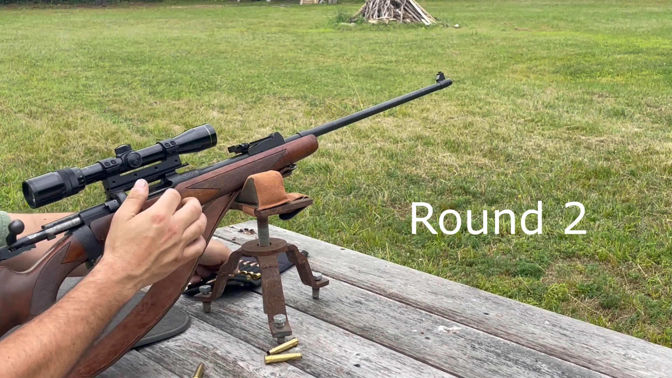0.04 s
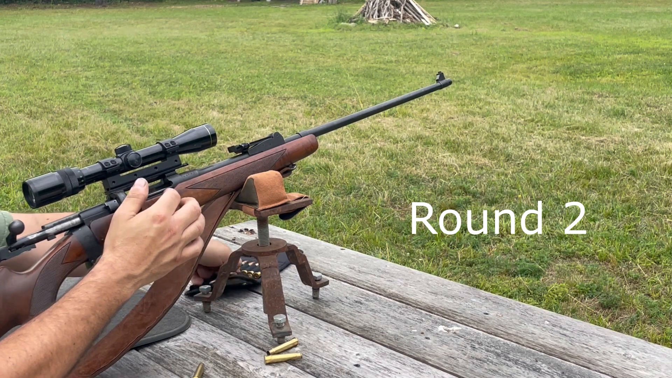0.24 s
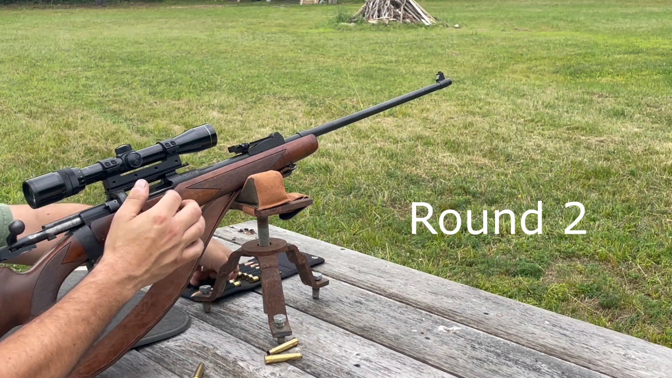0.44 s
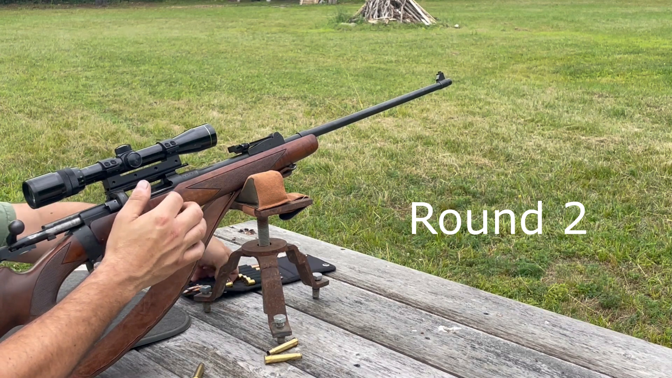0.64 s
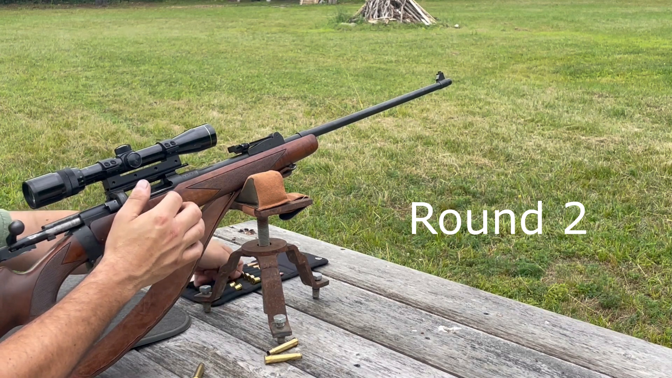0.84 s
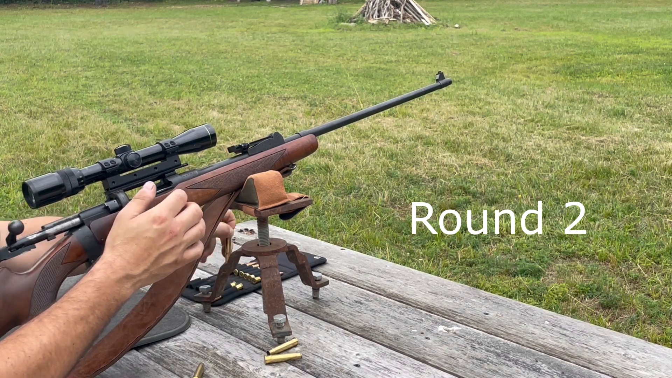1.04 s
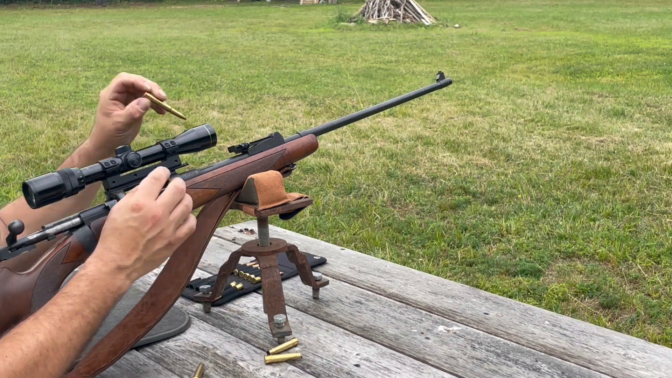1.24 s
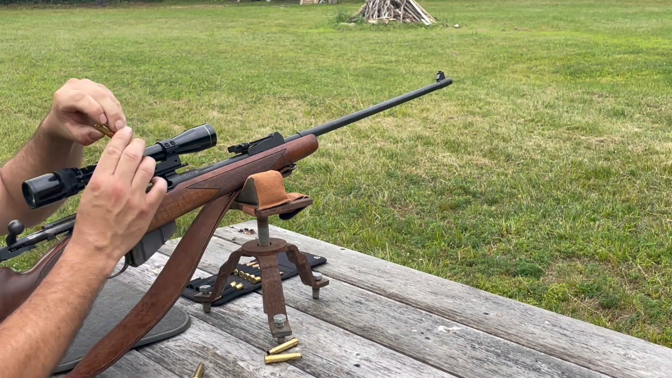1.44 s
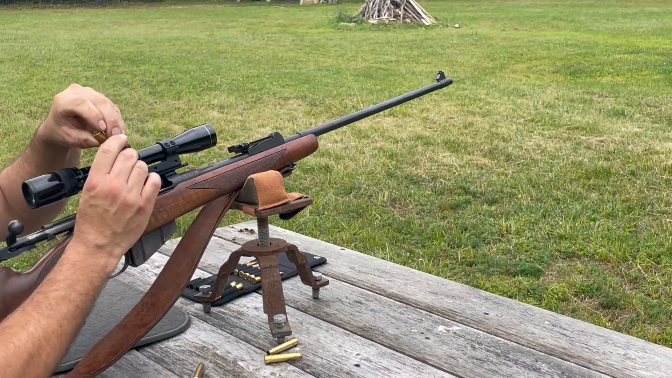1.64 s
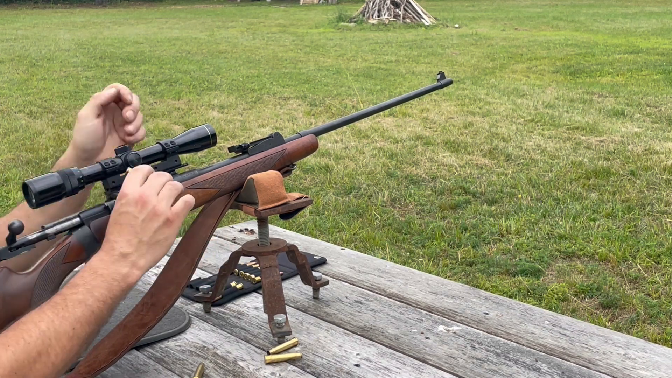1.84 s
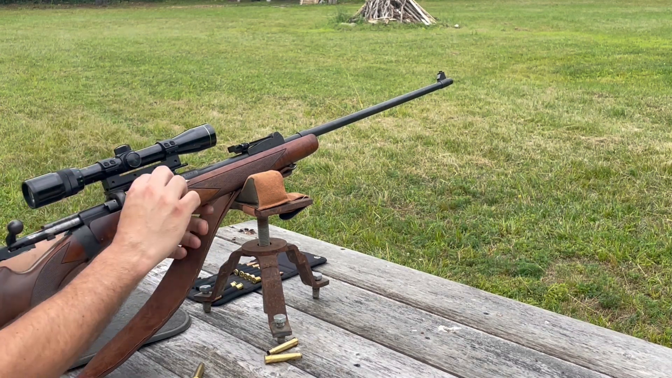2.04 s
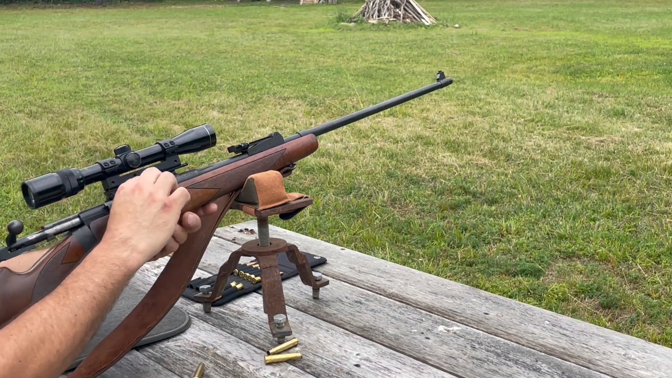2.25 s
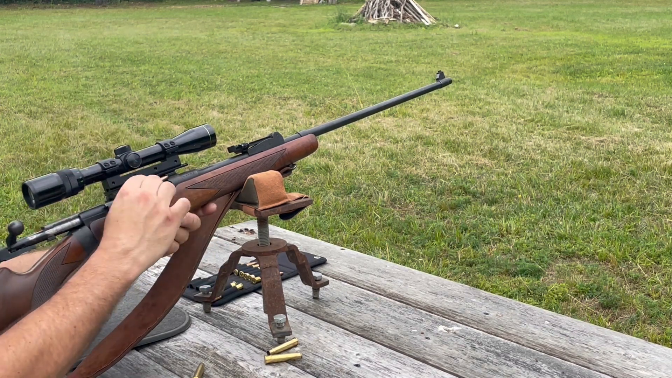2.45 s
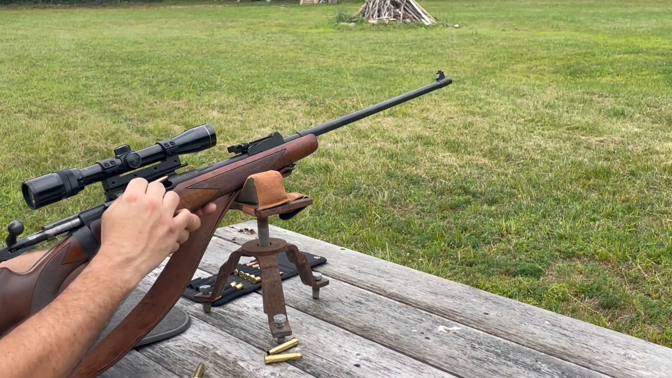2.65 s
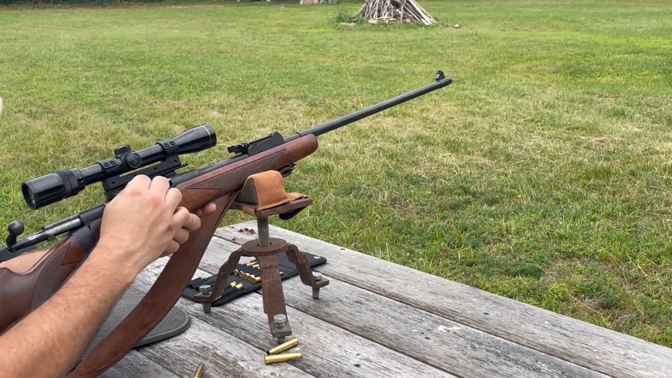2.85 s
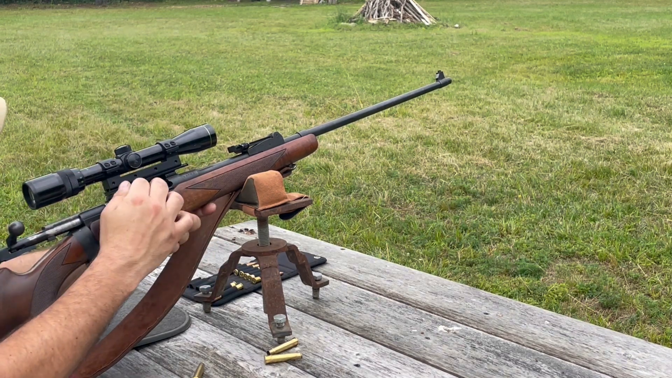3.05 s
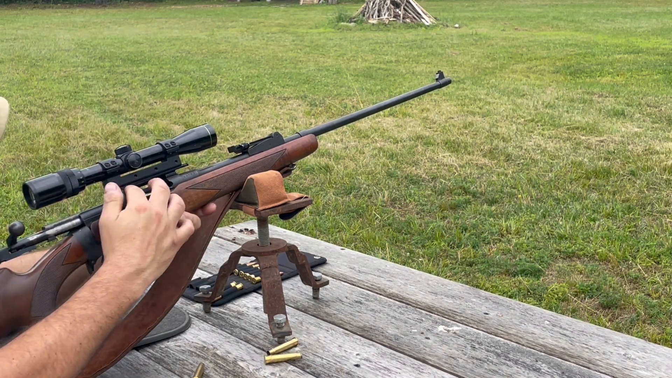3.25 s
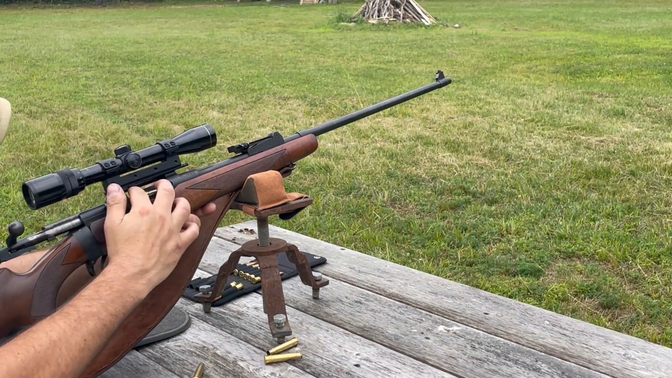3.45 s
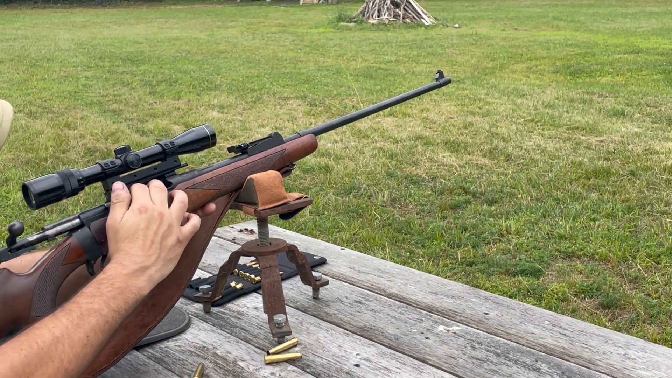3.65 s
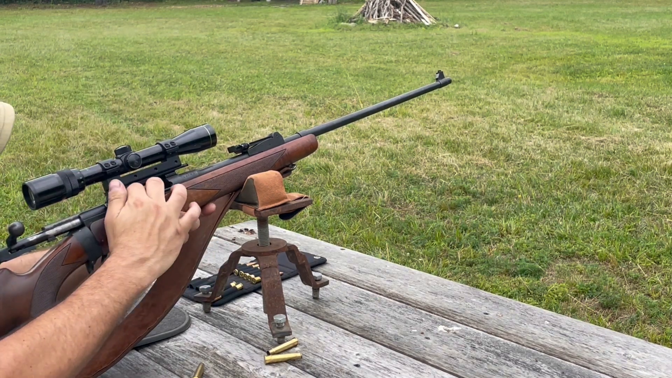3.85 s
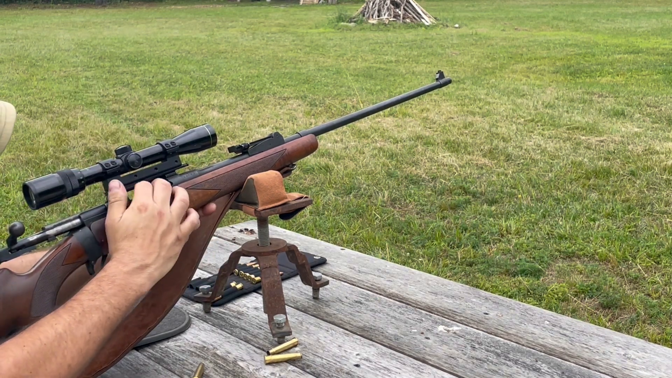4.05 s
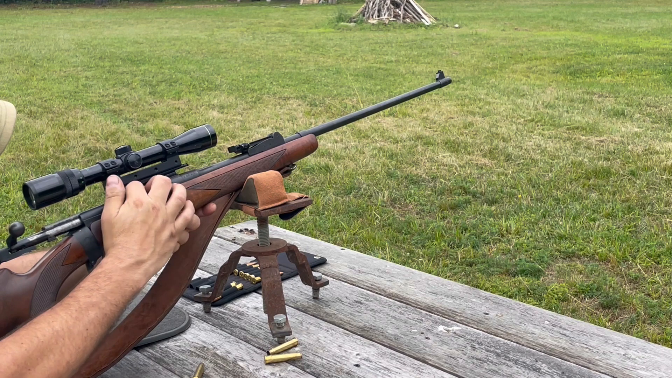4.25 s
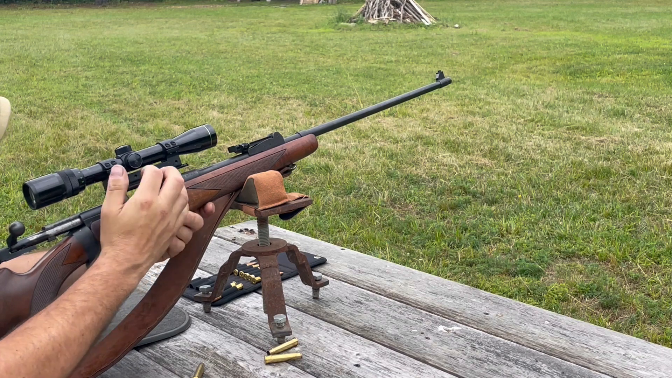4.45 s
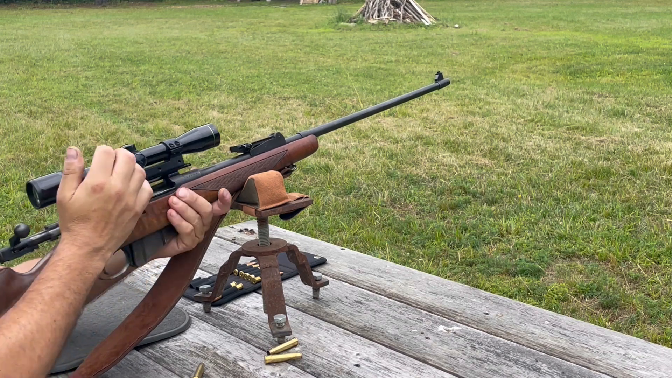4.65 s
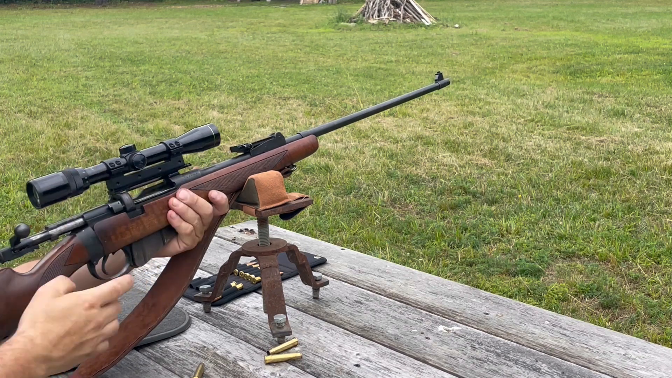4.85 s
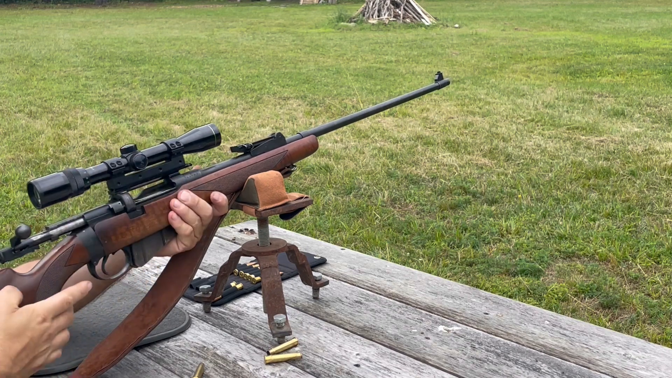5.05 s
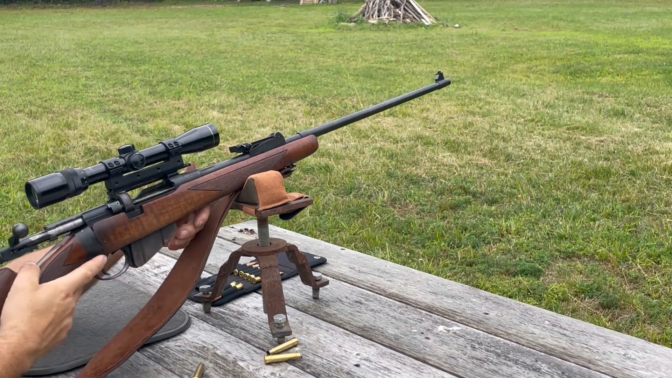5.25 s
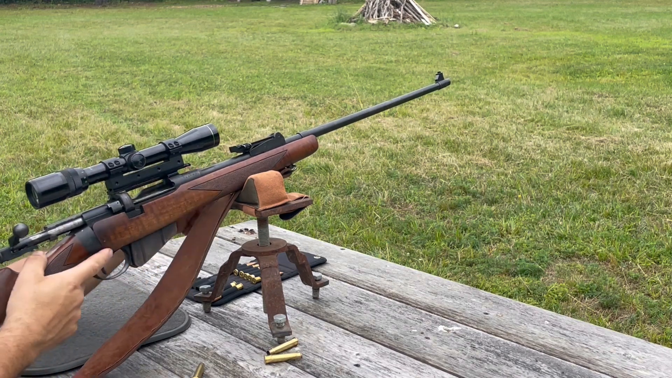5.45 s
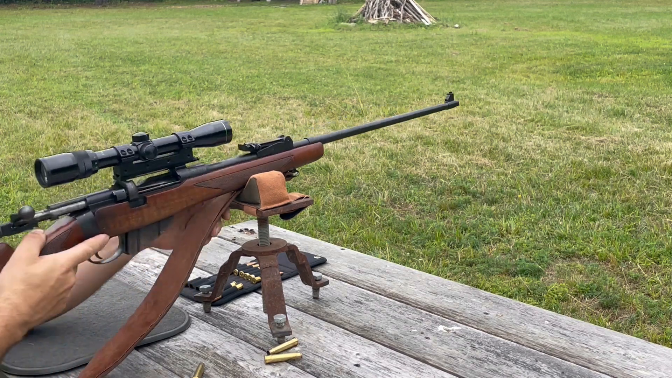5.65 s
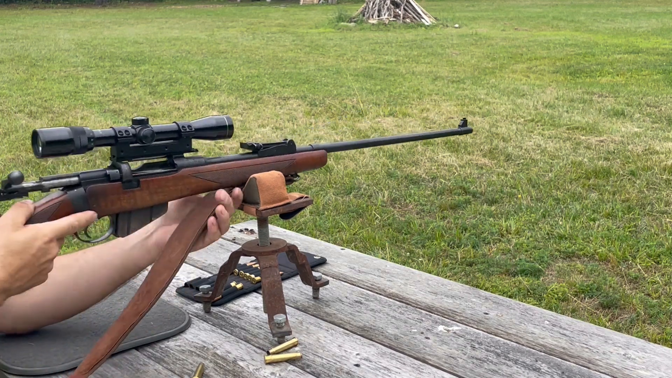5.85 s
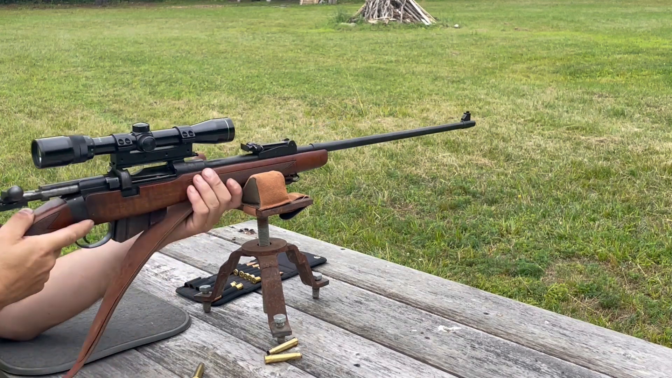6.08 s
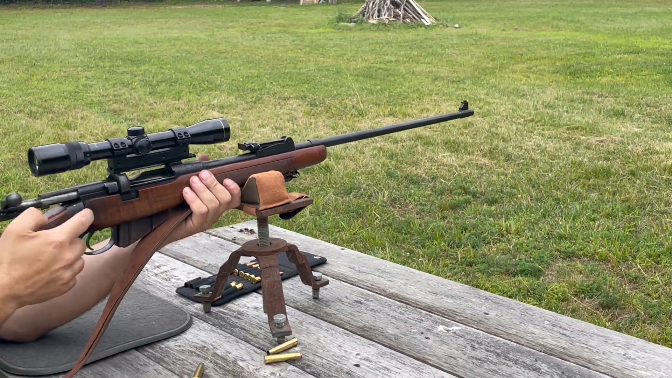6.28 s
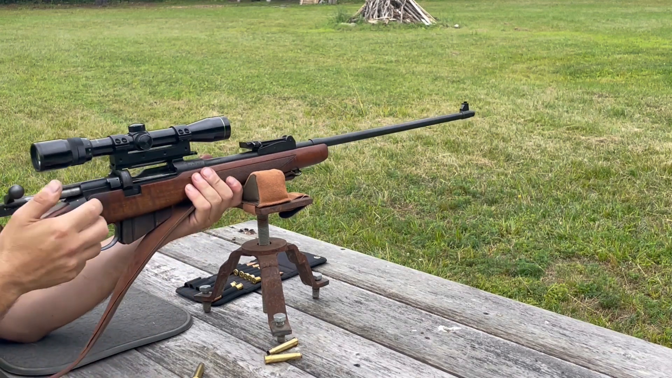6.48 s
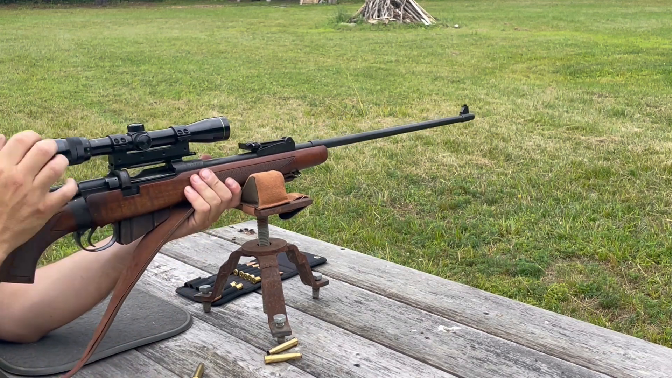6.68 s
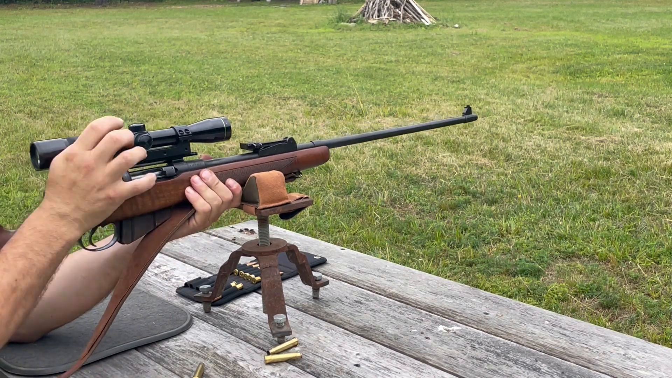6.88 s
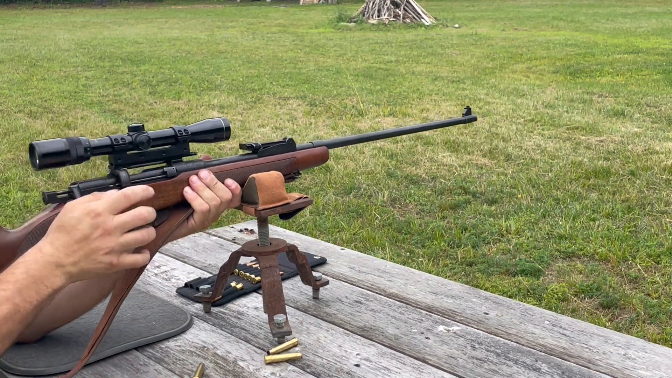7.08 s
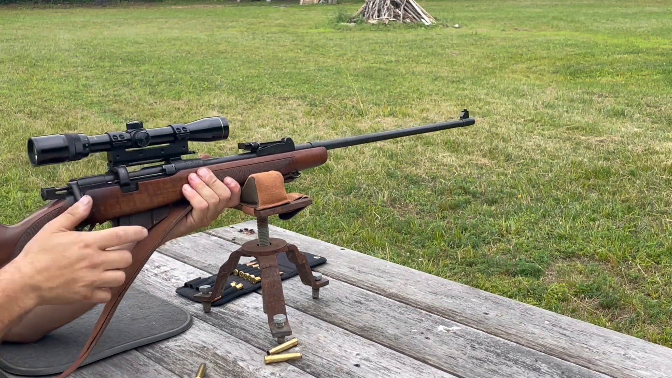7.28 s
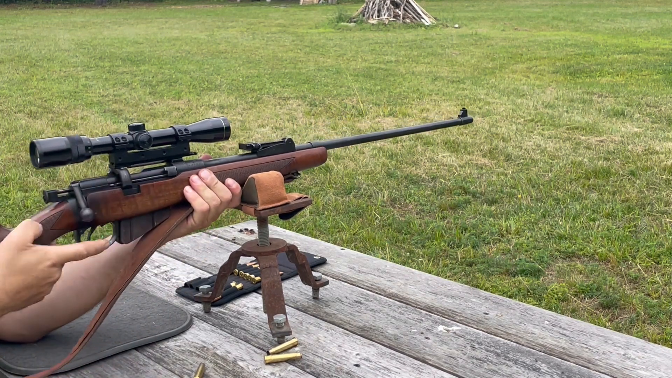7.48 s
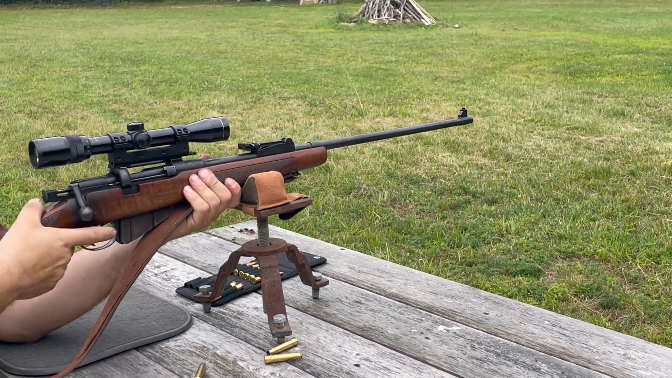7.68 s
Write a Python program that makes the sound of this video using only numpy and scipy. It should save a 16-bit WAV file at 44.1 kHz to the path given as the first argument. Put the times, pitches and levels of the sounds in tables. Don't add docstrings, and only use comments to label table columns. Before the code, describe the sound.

A brass cartridge taps and rattles into a metal magazine, clicks firmly home, then a rifle bolt slams shut with bright steel clacks outdoors.

```python
import sys
import numpy as np
from scipy import signal
from scipy.fft import rfft, irfft, next_fast_len
from scipy.io import wavfile
from scipy.ndimage import uniform_filter1d

SR = 44100
rng = np.random.default_rng(int(sys.argv[2]) if len(sys.argv) > 2 else 0)


def invert_db(level):
    return 10 ** (np.asarray(level, dtype=float) / 20)


def output_pcm(signal):
    pcm = np.clip(np.atleast_2d(signal).T, -1, 1) * 32767
    wavfile.write(sys.argv[1], SR, np.round(pcm).astype(np.int16))


N = 340468

# (time [s], level
# [dB], top pitch [Hz], body under 1.5 kHz [dB], edge over 6.5 kHz [dB])
STEEL_HITS = [(6.7354, -51.5, 2030, -16, -8), (6.7559, -39, 2570, -34, -18.5), (6.7691, -19, 2200, -5, -18),
              (6.7785, -26, 2350, -7.5, 2.5), (6.7865, -28, 2096, -3.5, 0.5), (6.798, -20.5, 2240, -10, 3),
              (6.8211, -19.5, 3420, -1, 2), (6.8324, -24.5, 3300, -15, 2), (6.8403, -26, 2200, -4.5, 4.5),
              (6.8531, -27, 2246, -10.5, -4), (6.8685, -18, 6120, -8.5, 1.5), (6.8928, -59, 2430, 0, -20),
              (6.9079, -16, 2220, -12, -12), (6.9439, -40, 4570, -20, -11.5), (6.9829, -45.5, 2410, -1, -19),
              (6.989, -43.5, 2430, -3.5, -28.5), (7.0006, -51.5, 1130, 13.5, -19),
              (7.042, -21.5, 6150, -21, 2.5), (7.0439, -17.5, 2750, 2, -8.5),
              (7.0705, -48.5, 2370, 9.5, 1.5),
              (2.055, -54, 3300, -16, -4.5), (2.1911, -32, 1840, -11, -9.5),
                (3.4191, -50.5, 2220, -20, -9), (4.1479, -43.5, 4310, -4, -5.5),
                (4.2241, -40, 4936, -17.5, -11), (3.7845, -19.5, 4980, -16.5, -3),
                (6.7652, -24.5, 3960, -14, 1.5), (6.8036, -21, 2126, -2.5, 6),
                (6.8667, -23.5, 2492, 0.5, -2.5)]
# (time [s], level [dB], top pitch [Hz], body [dB], edge [dB])
SEATING_HITS = [(3.3685, -39.5, 1260, -9.5, -10.5), (3.43, -47, 2440, -5, -14), (3.4833, -48, 840, 4, -9.5),
                (3.4882, -42, 2120, -14, -14.5), (3.5068, -50, 2430, 0, -14),
                (3.6232, -40.5, 1770, -2.5, -18.5), (3.634, -50, 1110, -2, -23),
                (3.6439, -29, 3400, -15, -6), (3.7118, -43.5, 2200, -13.5, -22),
                (3.7184, -23.5, 1020, -4.5, -11.5), (3.7703, -41, 2300, -10, -30),
                (3.7834, -12.5, 2070, -16, -6.5), (3.803, -51.5, 1950, -7.5, -16),
                (3.8266, -46.5, 2230, -22, -14), (3.9192, -47, 1530, 6, -18.5),
                (4.1522, -31, 1060, 5.5, -11), (4.1532, -22, 2360, -8.5, -10.5),
                (4.2233, -37.5, 2200, -15.5, -16.5), (4.3265, -29.5, 1974, -8.5, -8)]
# (time [s], level [dB], top pitch [Hz], body [dB])
CASE_HITS = [
    (2.1471, -42, 1840, -4.5),
    (2.1876, -27.5, 2940, -20),
    (2.2367, -35.5, 2750, -15),
    (2.393, -26, 3420, -29.5),
    (2.4043, -38, 2950, -18),
    (2.5316, -45.5, 3440, -19),
]
# (time [s], level [dB])
CHATTER_HITS = [(2.2443, -40.5), (2.251, -34.5), (2.2585, -43.5), (2.2661, -41.5), (2.2704, -41.5),
                (2.2761, -42.5), (2.2836, -45), (2.29, -49), (2.296, -53.5)]
# (time [s], level [dB], top pitch [Hz], body [dB], edge [dB])
LOOSE_HITS = [(2.8511, -28.5, 2530, -10.5, -2), (2.8652, -33.5, 3880, -11.5, -3.5),
              (2.8748, -40.5, 2700, -16, -7.5), (3, -38, 2460, -5.5, -9), (3.0267, -37.5, 2300, -10, -4.5),
              (3.0396, -35.5, 2280, -2, -5), (3.0513, -45, 1120, -4, -10), (3.084, -50.5, 1110, 8.5, -25),
              (3.1001, -37.5, 2430, -7.5, 1), (3.111, -46.5, 2300, 0.5, -7.5), (3.1477, -45, 2700, -9, -14),
              (3.1548, -53, 1070, -7, -14), (3.1749, -48.5, 2400, -3, -22)]
# (time [s], level [dB], top pitch [Hz])
HANDLING_TICKS = [(0.4473, -52, 2700), (0.7384, -49, 1630), (0.7795, -52.5, 1240), (.826, -62, 1200),
                  (0.878, -65, 1200), (1.9243, -60.5, 2690), (4.504, -62.5, 2590), (4.659, -62, 1135),
                  (5.1888, -56, 6330), (5.262, -62, 800), (5.7944, -60.5, 2030), (5.884, -61.5, 890),
                  (5.96, -59.5, 1110), (6.0745, -60, 3400), (6.1851, -56, 4200), (6.2175, -61, 2220),
                  (6.282, -58, 5000), (6.296, -49, 6100), (6.394, -45.5, 2500), (6.416, -52, 2750),
                  (6.546, -42, 2240), (6.659, -54.5, 2490), (6.698, -52, 2200), (7.178, -48.5, 620),
                  (7.194, -51, 5220), (7.2295, -60, 2670), (7.296, -55.5, 5440), (7.3641, -57, 3770),
                  (7.445, -52, 5200), (1.981, -69, 630), (2.01, -64.5, 800), (2.074, -69.5, 820),
                  (2.965, -61, 5000), (3.237, -63, 5200), (5.427, -70.5, 940), (5.489, -72, 750),
                  (5.501, -65, 580), (5.63, -66.5, 850), (5.545, -64.5, 700), (6.559, -48, 2400),
                  (7.686, -58.5, 5160), (7.716, -57.5, 4740)]
# (time [s], level [dB], pitch [Hz])
CREAK_PIPS = [(5.49, -66, 2400), (5.532, -56, 2700), (5.538, -52.5, 2500), (5.547, -60, 2700),
              (5.562, -59, 2500), (5.578, -60, 2300), (5.599, -56, 2500), (5.6, -63, 1350),
              (5.61, -64, 2400), (5.616, -62, 2400), (5.626, -60, 2300), (5.651, -59, 2250),
              (5.657, -64, 2350), (5.666, -64.5, 2420), (6.409, -58, 3750), (6.416, -51.5, 5600),
              (6.497, -61.5, 4300), (6.51, -62, 3770), (6.521, -59.5, 3900), (6.529, -66, 4200),
              (6.537, -67, 3900), (6.548, -43.5, 5290), (2.055, -58, 5700), (1.98, -64, 2850),
              (.7795, -52.5, 2240), (0.737, -55, 2400)]
FREE_S = [2.393, 4.154, 6.8697, 6.9079]
# (pitch [Hz], body [dB])
TICK_BODY = [(900, 9.5), (2000, -3), (5000, -21.5)]
# (frequency [Hz], level [dB], t60 [s])
BRASS_MODES = [(1180, -9, 0.089), (2200, 8, 0.11), (2670, -15, 0.045), (3164, -1, 0.07), (3520, 10, 0.05),
               (4550, -16, 0.066), (5800, -23, .08)]
# (frequency [Hz], level [dB], t60 [s])
NECK_MODES = [(11110, 31, 0.034)]
# (frequency [Hz], level [dB], t60 [s])
BOX_MODES = [(620, -14, 0.04), (1130, -10.5, 0.055), (1890, 3, 0.0048), (2142, -5.5, 0.021),
             (3320, -21.5, 0.04), (4950, -17.5, 0.025), (7400, -26.5, .09), (13200, -15.5, 0.1),
             (11700, -16, .02)]
# (frequency [Hz], level [dB], t60 [s])
STEEL_MODES = [(724, -5.5, 0.093), (885, -7.5, 0.035), (1200, -28, 0.035), (2350, -2, 0.045),
               (2430, -9, 0.034), (2920, -15, 0.03), (4700, -17, 0.027), (6650, -1, 0.02),
               (6450, -35.5, .2), (10600, -14.5, 0.028)]
# (frequency [Hz], density [dB per Hz])
METAL_COLOUR = [(200, -30.5), (600, -1), (1100, -2), (1700, -10.5), (2300, -0.5), (3000, 3), (5000, 2),
                (6500, -3), (7300, -3.5), (10000, -16.5), (13000, -22), (14200, -24.5), (15500, -24.5),
                (16500, -29)]
# (start [s], end [s], start level [dB], end level [dB], edge [dB])
STROKES = [(2.231, 2.307, -47, -60.5, -6), (2.367, 2.404, -58.5, -40, -7), (2.795, 2.839, -56, -55, -10),
           (2.854, 2.946, -37, -71.5, -7), (2.995, 3.083, -57, -59, -17), (3.084, 3.216, -49.5, -54, -35),
           (3.362, 3.448, -56, -59, -18), (3.712, 3.71, -52, -48, -8.5),
           (3.764, 3.796, -44.5, -33.5, -16.5), (3.749, 3.911, -48, -64, -12.5),
           (6.757, 6.782, -38, -36, 8), (6.795, 6.861, -20.5, -25, 7.5), (6.861, 6.903, -29.5, -46.5, -11),
           (6.964, 7.037, -57.5, -49, -16), (7.05, 7.095, -65, -50.5, -16.5)]
# (frequency [Hz], level [dB], t60 [s])
BENCH_MODES = [(75, -8.5, .12), (140.8, 3.5, 0.14), (195, 4, 0.057), (307.6, 6, 0.0065), (392, 4.5, 0.04),
               (553, 5, 0.01), (673, -18.5, 0.12), (800, -21, 0.033), (1200, -14.5, 0.0078)]
# (time [s], peak [dB], plank boom [dB], bounce time scale [1])
KNOCKS = [(0.737, -41.5, -11, 0.94), (1.088, -51, -1, 1.0), (5.261, -49, -4.5, 0.87), (5.462, -46, 2, 1.14),
          (6.392, -25, -4, 1.21), (6.549, -23, -3.5, .9), (6.663, -43.5, 4.5, 1.2), (6.904, -30.5, 4, 1.26),
          (6.994, -29.5, -1, 1.3), (7.18, -45.5, -7, 0.55)]
# (time [s], length [s], start pitch [Hz], end pitch [Hz], level [dB])
SQUEAKS = [(1.755, .025, 5000, 5250, -66), (1.77, .065, 3050, 2700, -64), (1.84, .05, 3500, 3150, -62),
           (1.83, .04, 2600, 2400, -65), (2.95, .025, 1550, 1600, -63), (3.292, .02, 4600, 4100, -64),
           (3.296, .042, 1900, 2280, -59), (6.6, .06, 2750, 2850, -63)]
# (start [s], end [s], level [dB], smoothness [0 coarse cloth to 1 bare skin])
RUBS = [(0, 0.329, -67, 0.42), (0.366, 0.418, -58, 0.02), (0.335, 0.597, -53, 0.4),
        (0.657, 0.777, -54, 0.5), (0.863, 0.996, -61, .3), (1.06, 1.138, -74, 0), (1.979, 2.073, -63, 0.7),
        (4.497, 4.704, -72, 0.77), (5.078, 5.232, -68, .95), (5.236, 5.451, -68.5, .7),
        (5.484, 5.58, -56, .2), (5.572, 5.683, -63.5, .3), (5.673, 5.9, -65.5, .8), (5.906, 5.99, -57, .6),
        (6.083, 6.194, -63, 0.04), (6.178, 6.438, -60.5, 0.52), (6.378, 6.394, -52, 0.4),
        (6.43, 6.615, -68.5, 0.05), (6.644, 6.75, -59.5, 0.5), (7.076, 7.314, -60, 0.6),
        (7.337, 7.468, -62.5, 0.58)]
# (frequency [Hz], density [dB per Hz])
WEAVE_COLOUR = [(200, 17), (500, -2), (1000, -8), (1700, -3.5), (2500, -5), (3600, -12.5), (5000, -10.5),
                (7000, -16.5), (10000, -12.5), (13500, -26.5), (15000, -20.5)]
# (coarse [dB], smooth [dB])
HISS_DB = (-22.5, -0.5)
# (coarse [dB], smooth [dB])
SHUFFLE_DB = (2, -15)
# (frequency [Hz], density [dB per Hz])
FIELD_COLOUR = [(40, 4.5), (80, 3.5), (160, -11), (300, -16), (800, -18), (1600, -26), (2200, -23),
                (4500, -27.5), (7200, -34.5), (8100, -20.5), (8900, -21), (9700, -41), (11000, -46.5),
                (16000, -62)]
# (frequency [Hz], likeness [0-1])
FIELD_LIKENESS = [(60, 1), (300, 0.83), (700, 0.16), (1400, 0), (2200, 0.93), (3000, 1), (6000, 1.0),
                  (11000, 0.96), (15000, 0.89)]
# (frequency [Hz], left re right [dB])
NEAR_LEFT = [(60, 0), (150, -0.5), (380, -0.5), (950, 4), (2380, 2), (5980, -1), (15000, 1)]
# (frequency [Hz], left lead [rad])
PORT_PHASE = [(0, 0), (780, 0.4), (1550, 0.0), (1810, 0.4), (2070, 0.1), (5170, 0.1), (6290, -0.4),
              (7240, -1.5), (8010, -2.9), (10400, -5.4), (12700, -7.1), (13900, -8.8), (15400, -9.7),
              (16200, -9.3)]

HARD_DB, SOFT_DB = -27, -45


def evened(x):
    return x / np.sqrt(np.mean(x ** 2) + 1e-20)


def read(points, hz):
    f, value = np.transpose(points)
    return np.interp(np.log(hz + 1), np.log(f + 1), value)


def add(mix, start_s, sound):
    part = mix[round(start_s * SR):][:len(sound)]
    part += sound[:len(part)]


def shaped(x, gain):
    size = next_fast_len(x.shape[-1] + 2048)
    hz = np.fft.rfftfreq(size, 1 / SR)
    return irfft(rfft(x, size) * gain(hz), size)[..., :x.shape[-1]]


def band(x, lo_hz, hi_hz):
    sos = signal.butter(2, [lo_hz, hi_hz], "band", fs=SR, output="sos")
    return evened(signal.sosfilt(sos, x))


def level(spans, smooth_s):
    t, gain = np.arange(N) / SR, np.zeros(N)
    for start, end, *db in spans:
        on = slice(int(start * SR), int(end * SR))
        gain[on] += invert_db(np.interp(t[on], [start, end], db))
    return uniform_filter1d(gain, size=int(smooth_s * SR))


def hardness(db, soft, hard):
    return np.interp(db, [SOFT_DB, HARD_DB], [soft, hard])


def edged(rows, soft_db, hard_db):
    out = []
    for row in rows:
        slam_db = 0.29 * max(row[1] - HARD_DB, 0)
        out.append(row + (hardness(row[1], soft_db, hard_db) + slam_db,))
    return out


def ring(modes, strike, damping, size):
    t, x = np.arange(size) / SR, np.zeros(size)
    for (hz, db, t60), (level_shift, pitch_shift) in zip(modes, strike):
        decay = invert_db(db + 6 * level_shift - 60 * damping * t / t60)
        x += decay * np.sin(2 * np.pi * hz * (1 + pitch_shift) * t)
    return x / np.linalg.norm(x)


def contacts(rows, modes, ring_db, upper_db, soft_s, hard_s, held=5.1, peak_db=13, width_hz=420,
             rise_s=0.0015, tilt_db=0.5):
    out, t, hz = np.zeros(N), np.arange(4096) / SR, np.fft.rfftfreq(6144, 1 / SR)

    def energy(z, lo_hz, hi_hz):
        return np.sum(abs(z[(hz > lo_hz) & (hz < hi_hz)]) ** 2)

    for s, db, top_hz, low_db, edge_db in rows:
        noise, clumps = rng.standard_normal((2, 4096))
        t60_s = max(hardness(db, soft_s, hard_s), .004)
        rattle = noise * invert_db(12 * uniform_filter1d(clumps, size=30) - 60 * t / t60_s)
        rattle *= 1 - np.exp(-t / rise_s)

        strike = rng.standard_normal((len(modes), 2))
        if min(abs(s - np.array(FREE_S))) < .003:
            rung = ring(modes, strike * [.3, 0], 1, 4096)
        else:
            rung = ring(modes, strike * [1, .012], held, 4096)
        z = rfft(rattle, 6144) * (1 + rfft(invert_db(ring_db) * rung, 6144)) * invert_db(read(METAL_COLOUR, hz))

        lean_db = upper_db + 3.1 * np.clip((top_hz - 2700) / 1500, 0, 1) + 0.18 * edge_db
        lean_db += 10 * np.log10(energy(z, 1500, 3600) / energy(z, 3600, 6300))
        z *= invert_db(read([(3300, 0), (3900, lean_db)], hz))
        top = invert_db(peak_db - 48.0 * width_hz * t) * np.sin(2 * np.pi * top_hz * t)
        z *= 1 + rfft(top * 2 * np.pi * width_hz / SR, 6144)

        edges_hz = [(500, 1500), (1500, 6000), (6500, 14000)]
        have_db = [10 * np.log10(energy(z, *e) / 3072 / 220) for e in edges_hz]
        low, mid, edge = np.array([db + low_db, db, db + edge_db]) - have_db
        balance = [(700, low - 3), (1100, low + 3), (1700, mid), (5900, mid),
                   (6800, edge - tilt_db), (11000, edge + tilt_db)]
        z *= invert_db(read(balance, hz))
        add(out, s - 64 / SR, np.roll(irfft(z), 64)[:4096])
    return out


def bolt():
    return contacts(STEEL_HITS, STEEL_MODES, ring_db=-9.0, upper_db=3.0,
                    soft_s=0.039, hard_s=0.019, rise_s=0.00068, tilt_db=2.5)


def seating():
    return contacts(SEATING_HITS, BOX_MODES, ring_db=-4.5, upper_db=-2,
                    soft_s=0.024, hard_s=0.01, rise_s=0.00094, tilt_db=4.0)


def cartridge():
    brass, box = BRASS_MODES + NECK_MODES, BOX_MODES + NECK_MODES
    placed = contacts(edged(CASE_HITS, soft_db=-26.5, hard_db=-11.0), brass, ring_db=-13.5,
                      upper_db=-4.5, soft_s=0.033, hard_s=0.016)
    loose = contacts(LOOSE_HITS, box, ring_db=-0.5, upper_db=5,
                     soft_s=0.028, hard_s=.015, rise_s=0.00097, tilt_db=3)
    rows = [row + (3200, -14.5, -19) for row in CHATTER_HITS]
    chatter = contacts(rows, brass, ring_db=-10, upper_db=5,
                       soft_s=0.016, hard_s=0.011, peak_db=11, rise_s=0.00073)
    return placed + loose + chatter


def scraping(strokes, modes, ring_db, edge_hz):
    slips = rng.standard_normal(N) * invert_db(2.0 * rng.exponential(1, N)) * (rng.random(N) < .3)
    slips *= invert_db(37 * uniform_filter1d(rng.standard_normal(N), size=150))
    part = ring(modes, np.zeros((len(modes), 2)), 1.7, size=2048)
    rung = slips + invert_db(ring_db) * signal.oaconvolve(slips, part)[:N]
    metal = evened(shaped(rung, lambda hz: invert_db(read(METAL_COLOUR, hz)) / (1 + (hz / 14000) ** 30)))
    edge = shaped(metal, lambda hz: 1 / (1 + (edge_hz / (hz + 1)) ** 4))
    body_level = level([row[:4] for row in strokes], .004)
    edge_level = level([(a, b, c + e, d + e) for a, b, c, d, e in strokes], .004)
    return body_level * (metal - edge) + edge_level * edge


def scrapes():
    loading = scraping([row for row in STROKES if row[0] < 4], BOX_MODES, ring_db=-20, edge_hz=4000)
    sliding = scraping([row for row in STROKES if row[0] > 4], STEEL_MODES, ring_db=-5, edge_hz=6500)
    return loading + sliding


def handling_ticks():
    rows = []
    for row in HANDLING_TICKS:
        body_db = read(TICK_BODY, row[2])
        rows.append(row + (body_db, -16 - 0.26 * body_db))
    return contacts(rows, BOX_MODES, ring_db=-16.5, upper_db=-8.5, soft_s=.028, hard_s=.028)


def creaks():
    rows = [row + (-22, -20) for row in CREAK_PIPS]
    return contacts(rows, BOX_MODES, ring_db=-25, upper_db=7, soft_s=.016, hard_s=.016,
                    peak_db=23.5, width_hz=170)


def knocks():
    out, t = np.zeros(N), np.arange(3500) / SR
    bounces = [(.005, 0.6), (.013, 0.51), (.024, 0.3), (.036, .18), (.052, 0.09)]  # (time [s], gain)
    for s, db, boom_db, pace in KNOCKS:
        noise, strike = rng.standard_normal(3500), rng.standard_normal((len(BENCH_MODES), 2))
        planks = [(hz, d + boom_db * (hz < 250), t60) for hz, d, t60 in BENCH_MODES]
        push = sum(g * np.exp(-abs(t - at * pace) / 0.0046) for at, g in bounces)
        bench = ring(planks, strike * [.4, .05], 0.6, size=6000)
        knock = signal.fftconvolve(band(push * noise, 60, 3000), bench)
        add(out, s, invert_db(db) * knock / abs(knock).max())
    return out


def squeaks():
    out = np.zeros(N)
    for s, length_s, start_hz, end_hz, db in SQUEAKS:
        hz = np.linspace(start_hz, end_hz, int(length_s * SR))
        hz *= 1 + 0.17 * uniform_filter1d(rng.standard_normal(3000), size=90)[:len(hz)]
        grip = 1 + 5.0 * uniform_filter1d(rng.standard_normal(3000), size=60)[:len(hz)]
        tone = np.sqrt(2) * np.sin(2 * np.pi * np.cumsum(hz) / SR)
        add(out, s, invert_db(db) * grip * tone * np.hanning(len(hz)))
    return out


def cloth():
    grains = rng.standard_normal(N) * invert_db(2.0 * rng.exponential(1, N))
    grains *= invert_db(32 * uniform_filter1d(rng.standard_normal(N), size=400))
    hz, _, z = signal.stft(grains, SR, nperseg=256)
    patches = uniform_filter1d(rng.standard_normal(z.shape), size=5, axis=0)
    patches = evened(uniform_filter1d(patches, size=12, axis=1))
    woven = signal.istft(z * invert_db(read(WEAVE_COLOUR, hz)[:, None] + 2.6 * patches), SR)[1][:N]

    start, end, db, smooth = np.transpose(RUBS)
    hiss_db, shuffle_db = (db + coarse + (fine - coarse) * smooth for coarse, fine in (HISS_DB, SHUFFLE_DB))
    out = np.zeros(N)
    for layer_db, lo_hz, hi_hz in [(db, 1300, 8000), (hiss_db, 9000, 14500), (shuffle_db, 720, 1800)]:
        pressure = level(zip(start, end, layer_db, layer_db - 2), smooth_s=0.043)
        out += pressure * band(woven, lo_hz, hi_hz)
    return out


def bench_echo(x):
    t = np.arange(3000) / SR
    taps = rng.standard_normal((2, 3000)) * (rng.random((2, 3000)) < .06)
    taps *= invert_db(-60 * t / 0.057) * (t > .0015)
    taps = shaped(taps, lambda hz: 1 / (1 + (hz / 3500) ** 2))
    return signal.fftconvolve(x[None], taps / np.linalg.norm(taps[0]), axes=1)[:, :N]


def field():
    frames, hz = N // 256 + 5, np.fft.rfftfreq(1024, 1 / SR)
    a, b, c, d, patches = rng.standard_normal((frames, 513, 5)).T
    patches = uniform_filter1d(patches, size=10, axis=0)
    patches = evened(uniform_filter1d(patches, size=16, axis=1))
    swell = evened(uniform_filter1d(rng.standard_normal(frames), size=40)) * (hz[:, None] < 250)
    same = np.clip(read(FIELD_LIKENESS, hz), 0, 1)[:, None]
    left = a + 1j * b
    right = same * left + np.sqrt(1 - same ** 2) * (c + 1j * d)
    z = np.array([left, right]) * invert_db(read(FIELD_COLOUR, hz)[:, None] + 1.0 * patches + 1.4 * swell)
    return invert_db(-53.5) * evened(signal.istft(z, nperseg=1024, noverlap=768)[1][:, :N])


def scene():
    metal = bolt() + seating() + cartridge() + scrapes() + handling_ticks() + creaks()
    near = metal + knocks() + squeaks() + cloth()
    pair = shaped(near, lambda hz: invert_db(np.outer([.5, -.5], read(NEAR_LEFT, hz))))
    return pair + invert_db(-18.5) * bench_echo(metal) + field()


def band_limit(x):
    return signal.sosfilt(signal.butter(12, 16640, fs=SR, output="sos"), x)


def record(dry):
    cut = signal.sosfilt(signal.butter(4, 50., "high", fs=SR, output="sos"), dry)
    ported = shaped(cut, lambda hz: np.exp(1j * np.outer([.5, -.5], read(PORT_PHASE, hz))))
    rounded = ported / (1 + (ported / .92) ** 6) ** (1 / 6)
    return band_limit(rounded)


dry = scene()
out = record(dry)
output_pcm(out)
```